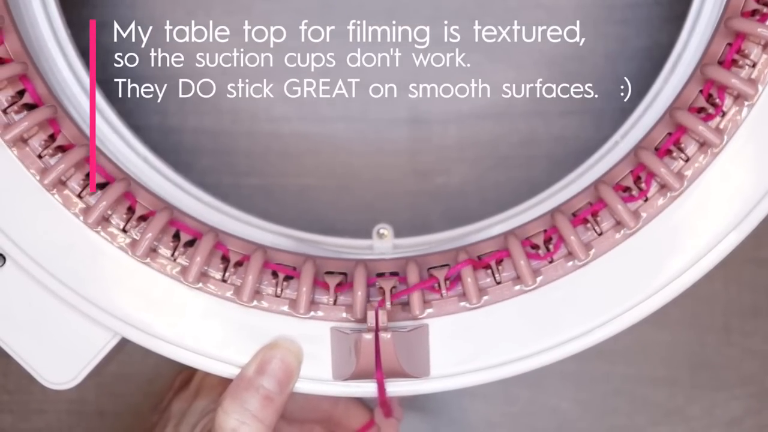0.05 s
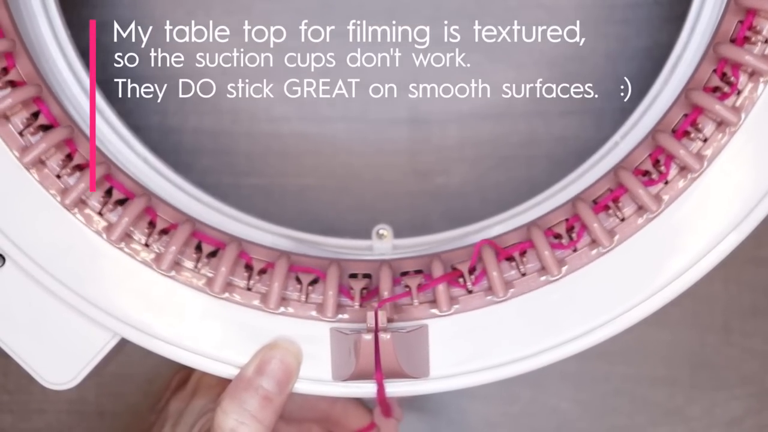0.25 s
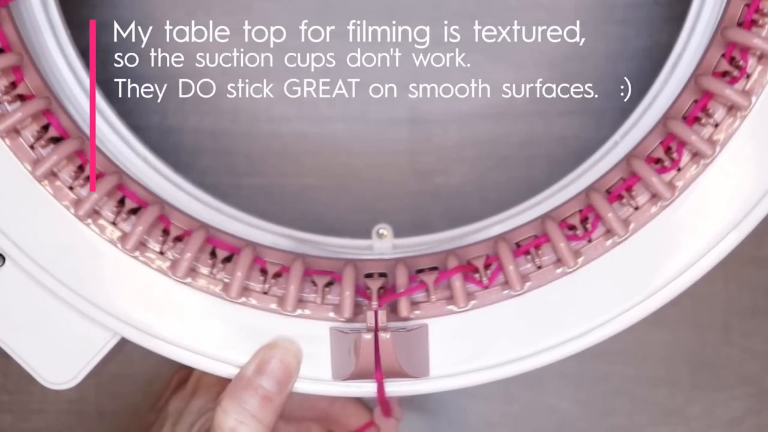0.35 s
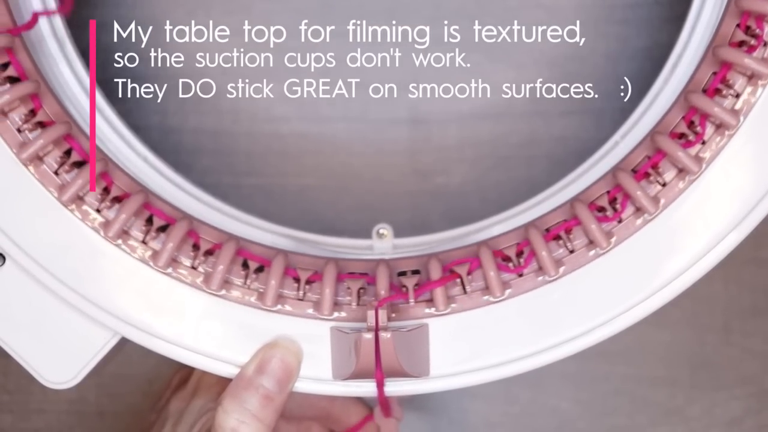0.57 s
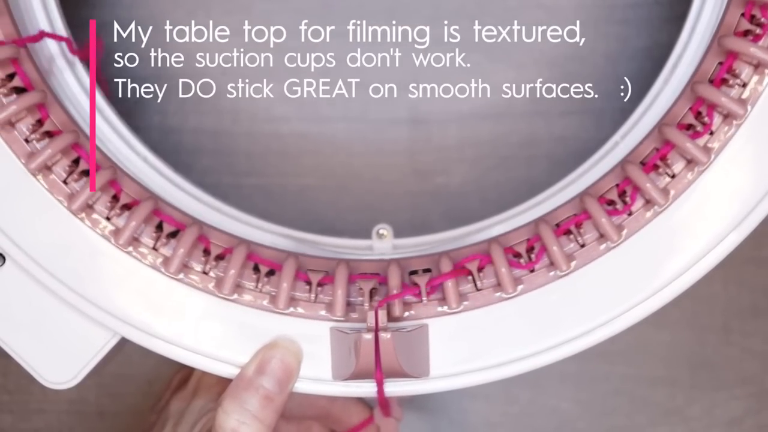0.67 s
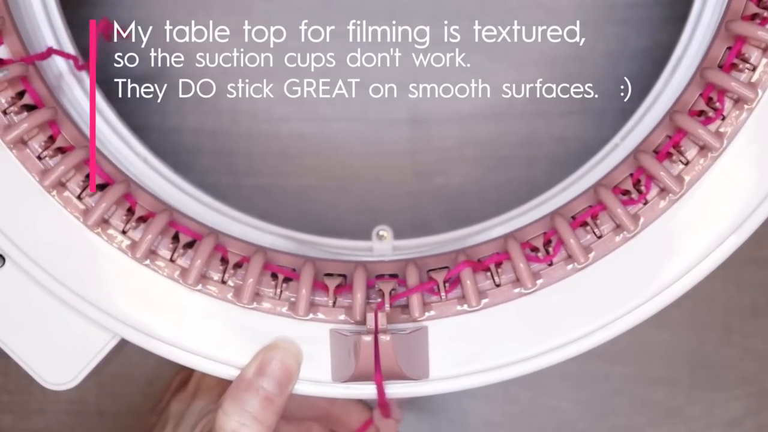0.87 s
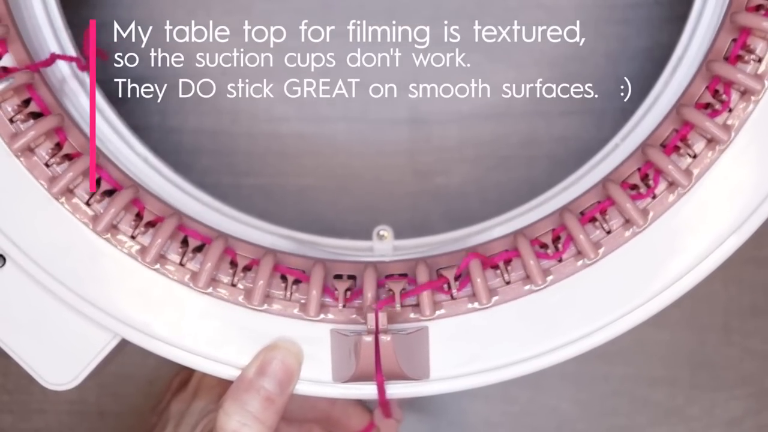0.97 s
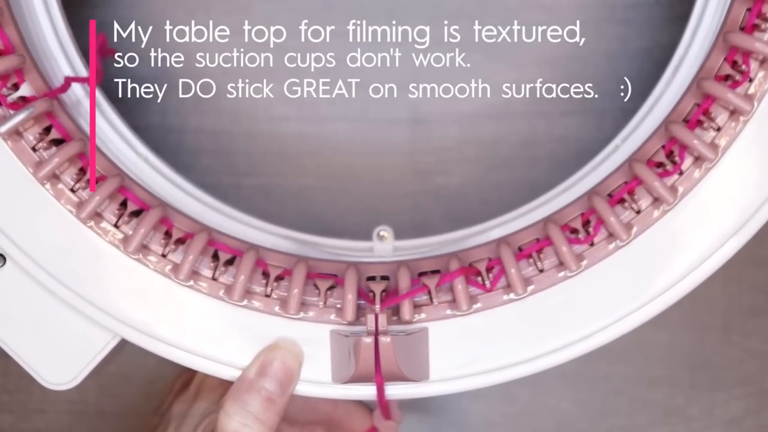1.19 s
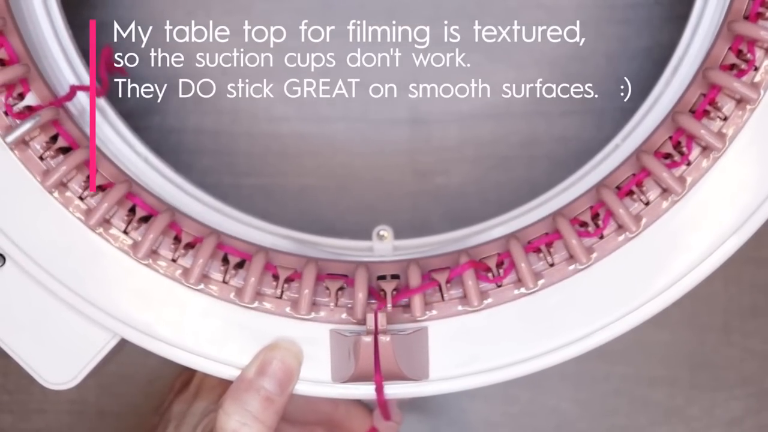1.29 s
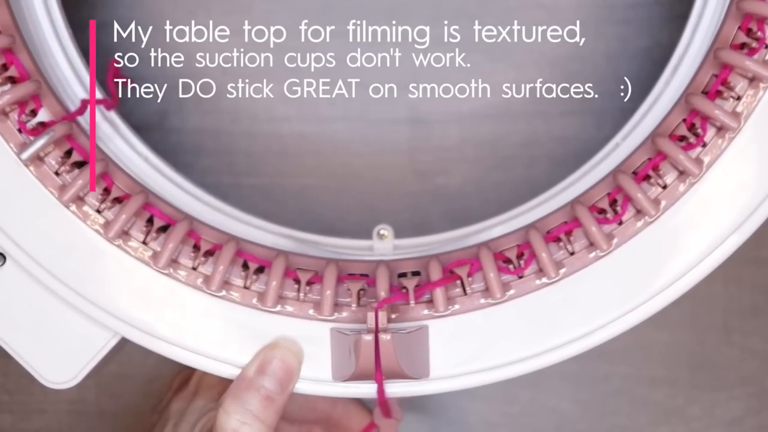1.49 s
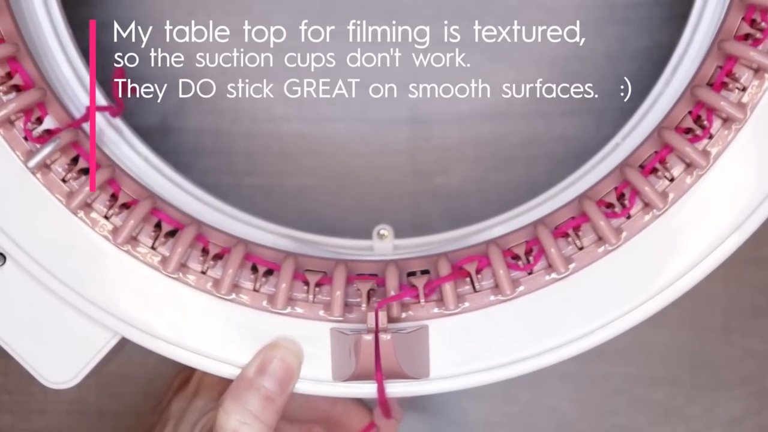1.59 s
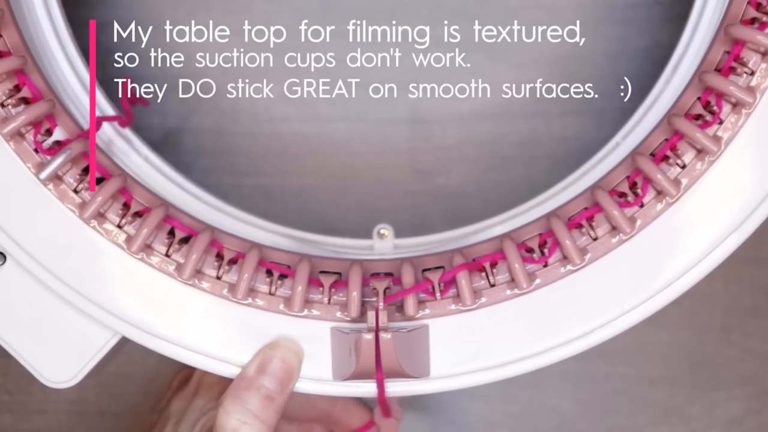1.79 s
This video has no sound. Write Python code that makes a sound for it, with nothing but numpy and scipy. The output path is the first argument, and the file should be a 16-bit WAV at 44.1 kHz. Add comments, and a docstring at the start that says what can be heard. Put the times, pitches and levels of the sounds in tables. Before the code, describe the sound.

Sharp, irregular plastic clicks come from the needles of a round knitting machine turning on a table. Two louder snaps carry a hollow knock, and the final one rings briefly. Faint rubbing and low room hush lie underneath, heard up close.

```python
"""A plastic knitting machine, turned slowly

A round knitting machine turns on a table, close to the microphone, in a quiet room. Its ring of
needles rubs softly in its track. Needles tick and snap through the cam, the ramp that guides them;
the hardest slips knock the hollow housing and thump the table. Near the end one needle twangs free."""
import sys
import numpy as np
from scipy import signal
from scipy.fft import rfft, irfft, next_fast_len
from scipy.io import wavfile
from scipy.ndimage import map_coordinates

SR = 44100
rng = np.random.default_rng(int(sys.argv[2]) if len(sys.argv) > 2 else 0)


def wav_out(sig):
    """Save sig, one row per channel (or a flat mono array), as 16-bit PCM at SR to the path in sys.argv[1]."""
    wavfile.write(sys.argv[1], SR, np.round(np.clip(np.atleast_2d(sig).T, -1, 1) * 32767).astype(np.int16))


N = 81585

# Natural tones of the needles and guides: pitch_hz, level_db, fade_s (time to fall by 60 dB)
NEEDLE_TONES = [(1025, -11, 0.058), (1207, -13, 0.071), (1408, -8.5, 0.056), (1585, -22, 0.044),
                (1918, -22, 0.061), (2139, -22, 0.075), (2505, -15.5, 0.04), (2753, -12.5, 0.04),
                (2912, -12, 0.026), (3640, -27, 0.032), (4890, -40, 0.023), (5430, -24.5, 0.037),
                (6180, -28, 0.019), (12480, -28, .02)]
# Natural tones of the hollow housing: pitch_hz, level_db, fade_s
HOUSING_TONES = [(339.7, -3.5, 0.18), (393, -9.5, 0.18), (522, -0.5, 0.16), (584, 1, 0.1), (679.6, 2, 0.11),
                 (717, -5.5, 0.12), (869, -3.5, 0.13)]


def amp(db):
    """Turn decibels into a multiplier."""
    return 10 ** (np.asarray(db) / 20)


def unit(x):
    """Scale a sound to an average (rms) level of 1."""
    return x / np.sqrt(np.mean(x ** 2) + 1e-20)


def along(points, hz):
    """Read between the rows of a (pitch_hz, value) table."""
    pitches, values = np.transpose(points)
    return np.interp(np.log(hz + 1), np.log(pitches + 1), values)


def coloured(x, colour):
    """Make pitches louder or softer, following a (pitch_hz, level_db) table."""
    size = 2 * next_fast_len(len(x))
    gain_db = along(colour, np.fft.rfftfreq(size, 1 / SR))
    cepstrum = irfft(gain_db * np.log(10) / 20, size)
    # Fold onto the first half, so the filter never sounds ahead of a click.
    cepstrum[1:size // 2] *= 2
    cepstrum[size // 2 + 1:] = 0
    return irfft(rfft(x, size) * np.exp(rfft(cepstrum)), size)[:len(x)]


def add(track, start_s, sound):
    """Mix a sound into the track."""
    part = track[max(0, round(start_s * SR)):][:len(sound)]
    part += sound[:len(part)]


def dying_noise(fades, t, count=12):
    """Countless close tones blur into noise whose bands each fade at their own speed."""
    hz = np.fft.rfftfreq(len(t), 1 / SR)
    centres = np.geomspace(fades[0][0], fades[-1][0], count)
    weights = np.array([along(list(zip(centres, row)), hz) for row in np.eye(count)])
    bands = irfft(rfft(rng.standard_normal(len(t))) * weights, len(t))
    return (bands * 10 ** (-3 * t / along(fades, centres)[:, None])).sum(0)


def ring(tones, attack_s, scatter_db):
    """A struck part rings at its natural tones, a little differently at each blow."""
    t = np.arange(SR // 2) / SR
    out = np.zeros(len(t))
    for hz, db, fade_s in tones:
        loudness = amp(db + scatter_db * rng.normal()) * 10 ** (-3 * t / fade_s)
        out += loudness * np.sin(2 * np.pi * (hz * t + rng.random()))
    return out * (1 - np.exp(-t / attack_s))


def rubbing():
    """The needle ring sticks and slips in its track, making the needles and housing sing faintly."""
    # How the rubbing swells and sinks: time_s, relative_db
    swell = [(0, -46), (.09, -44), (.13, -48), (.185, -56), (.25, -39.5), (.31, -37), (.39, -39),
             (.45, -36.5), (.53, -41), (.59, -40.5), (0.631, -39.5), (.68, -48), (.8, -42.5), (.92, -44.5),
             (.99, -47), (1.08, -43), (1.11, -37.5), (1.2, -38), (1.29, -45.5), (1.38, -49.5),
             (1.43, -44.5), (1.49, -38), (1.53, -43), (1.68, -45.5), (1.85, -51.5)]
    # Friction heard through the plastic: pitch_hz, level_db
    rub_colour = [(60, -10), (170, -3), (270, -15), (350, -3), (440, -11), (540, -5.5), (850, -8),
                  (1250, 4), (1450, 0.5), (1650, -4.5), (2900, -9.5), (3800, -17), (4700, -22), (5700, -18),
                  (7200, -28), (9000, -28.5), (16000, -33)]
    slips_per_s, flutter_per_s, flutter_db = 200, 45, 1.5
    slips = (rng.random(N) < slips_per_s / SR) * rng.standard_normal(N)
    friction = rng.standard_normal(N) + amp(-8.5) * unit(slips)
    rub = unit(coloured(friction, rub_colour))
    needles = unit(ring(NEEDLE_TONES, attack_s=0.0003, scatter_db=1.5))
    housing = unit(ring(HOUSING_TONES, attack_s=0.0047, scatter_db=4.5))
    singing = unit(signal.fftconvolve(rng.standard_normal(N), needles + amp(-3) * housing, "same"))
    # Sticking and slipping makes the level waver smoothly at random.
    flutter = map_coordinates(rng.standard_normal(N // 100), [np.arange(N) * flutter_per_s / SR])
    level_db = np.interp(np.arange(N) / SR, *np.transpose(swell)) + flutter_db * flutter
    return amp(level_db + 2) * unit(rub + amp(-5) * singing)


def room_noise():
    """The quiet room has a steady, low hush."""
    # Colour of the hush: pitch_hz, relative_db
    hush_colour = [(25, -4), (48, -9), (68, 4.5), (100, 5.5), (125, -5), (170, 0.5), (260, -11.5),
                   (500, -11.5), (1250, -16.5), (2000, -15.5), (4000, -23.5), (8000, -31), (16000, -34.5)]
    return amp(-47.5) * unit(coloured(rng.standard_normal(N), hush_colour))


def needle_clicks():
    """A needle hits the cam: a snap and a short ring, coloured by where it lands."""
    # Needle hits: start_s, level_db, hollow_db, bite_db, edge_db, treble_db, sparkle_db, fade_ratio
    hits = [ (0.0525, -25, -6, 1.5, 8.5, 0, -5, 0.88), (.0595, -24, 6, 2.5, -19, -17, -16, 0.82),
            (.1953, -19.5, 4, 4, 6, 10, 11, 2.4), (0.2035, -17.5, 7, 8, 3, 13.5, 12, 1.1),
            (.2088, -2.5, 2, 7.5, -1.5, 2.5, 4, 0.88), (.2478, -35, 12, 5, -2, 10, 10, 1),
            (0.2545, -26.5, 7, 8, -3, -5, -7, 1.4), (.3185, -28, -7, 5, -11, -7, -3, 0.9),
            (0.3505, -11, -4, -3, 9, 1, -1.5, 0.75), (0.3615, -15.5, 8.5, 8, -0.5, -7, -4, 0.88),
            (.4748, -24.5, -8, 23, 2, 10, 0, 1.1), (.478, -9.5, -1, 3.5, -0.5, -1, 8, 0.81),
            (0.6421, -26, 3, -29, -17, -15, -9, 0.97), (0.8891, -31.5, -14, -4, 3, 2, 6, 0.91),
            (0.8928, -23.5, 5, 9, -12.5, -9, -12, 1.2), (0.9552, -37, 5, 11, 7, -21, -14, 0.63),
            (1.0151, -25, 10.5, 5, 9, 6, 0, 0.76), (1.025, -18, 11, 8.5, 5, 1.5, 11, 0.84),
            (1.0369, -12, -5.5, 11, 1.5, 5.5, 11, 1.13), (1.0378, -6.5, 9, 10, -2, 4, -18, 0.82),
            (1.0437, -16.5, -18, 5, 3, 6, -6, 0.77), (1.055, -16, 5, 6.5, -4, -7, -20, 0.83),
            (1.1512, -24.5, 1, 4, -7, -18, -21, 1), (1.157, -20.5, -6, 12, -8, -20, -3, 0.76),
            (1.1654, -19, 2.5, -3, -5, -4, -7, 0.75), (1.1742, -21, -22, 0, -2.5, 14, 5, 0.78),
            (1.177, -12.5, -3, 1.5, 4.5, 5, -3, 0.66), (1.3104, -29, -12, -16, -4, -2, 2, 1.7),
            (1.3252, -9.5, 0, 6.5, 4.5, 1.5, -3, 0.8), (1.5409, -22, -23, 18, 6, -13, -4, 0.45),
            (1.549, -9, -13.5, 2, 1, 7, 3.5, 0.62), (1.551, -19, 4.5, 2, 12, -6, -3, 0.67)]
    # Colour of the ringing plastic: pitch_hz, level_db
    plastic_colour = [(100, -12), (380, -12), (560, -1), (880, -1), (1200, 9), (1420, 11.5), (1650, 0),
                      (2100, -1), (2400, -3.5), (2950, 3), (3500, -1.5), (4600, -6.5), (5900, -6.5),
                      (7600, -18), (10000, -19.5), (12000, -17.5), (16000, -31)]
    # How long it rings, before each hit's fade_ratio: pitch_hz, fade_s
    plastic_fades = [(300, 0.12), (1200, 0.049), (3000, 0.053), (6000, 0.033), (14000, 0.03)]
    rise_s, snap_db = 0.00021, 13
    out, t = np.zeros(N), np.arange(SR // 8) / SR
    for start_s, level_db, hollow_db, bite_db, edge_db, treble_db, sparkle_db, fade_ratio in hits:
        fades = [(hz, fade_s * fade_ratio) for hz, fade_s in plastic_fades]
        burst = dying_noise(fades, t) * (1 - np.exp(-t / rise_s))
        burst[round(rise_s * SR)] += amp(snap_db)
        plastic = coloured(burst, plastic_colour)
        tones = [(hz, db, fade_s * fade_ratio) for hz, db, fade_s in NEEDLE_TONES]
        needle = ring(tones, attack_s=0.00034, scatter_db=2.5)[:len(t)]
        tint = [(700, hollow_db), (1100, 0.0094), (1450, 0), (2000, bite_db), (3000, edge_db),
                (4200, 0), (6000, treble_db), (13000, sparkle_db)]
        add(out, start_s, amp(level_db - 3) * coloured(plastic + needle, tint))
    return out


def room_echo(x):
    """The room answers each sound with a short, fading tail."""
    # How long the room rings: pitch_hz, fade_s
    room_fades = [(100, 0.55), (1500, 0.25), (5000, 0.11), (14000, 0.2)]
    tail = dying_noise(room_fades, np.arange(SR // 2) / SR)
    return signal.fftconvolve(x, tail / np.linalg.norm(tail))[:N]


def knocks():
    """A jolt rings the hollow housing; the table follows more slowly with a thump."""
    # Jolts of the needle ring: start_s, housing_db, table_db
    jolts = [(0.21, -21, -20), (0.3626, -35.5, -27.5), (.479, -45.5, -40.5), (0.64, -45.5, -41.5),
             (1.0398, -25.5, -19), (1.166, -35.5, -26.5), (1.3266, -35.5, -30), (1.549, -43, -36)]
    # Colour of the housing's noisy ring: pitch_hz, level_db
    body_colour = [(60, -19), (150, 10.5), (260, -7.5), (360, 5.5), (450, -13), (560, -6), (750, 10),
                   (1000, -5.5), (1500, 4.5), (2200, -1), (4000, -5), (9000, -44)]
    # How long that ring lasts: pitch_hz, fade_s
    body_fades = [(150, 0.23), (700, 0.1), (3000, .05)]
    # Natural tones of the table: pitch_hz, level_db, fade_s
    table_tones = [(75.1, -7.5, 0.44), (94, 1, 0.17), (144.8, -3.5, 0.15), (198, -6.5, .12)]
    table_delay_s = 0.00773
    out, t = np.zeros(N), np.arange(SR // 4) / SR
    for start_s, housing_db, table_db in jolts:
        knock = ring(HOUSING_TONES, attack_s=0.0043, scatter_db=0.5)
        body = coloured(dying_noise(body_fades, t), body_colour)
        thump = ring(table_tones, attack_s=0.009, scatter_db=1.0)
        add(out, start_s, amp(housing_db) * knock)
        add(out, start_s, amp(housing_db + 7) * body)
        add(out, start_s + table_delay_s, amp(table_db) * thump)
    return out


def needle_twang():
    """One needle springs free and rings on."""
    # Natural tones of the free needle: pitch_hz, level_db, fade_s
    twang_tones = [(1790, -13, 0.048), (1904, -0.5, 0.058), (2580, -4, 0.03), (3310, -17, 0.041)]
    twang = amp(-11.5) * ring(twang_tones, attack_s=0.0006, scatter_db=1.0)
    out = np.zeros(N)
    add(out, start_s=1.549, sound=twang)
    return out


def scene():
    """Mix the machine's blows, their faint echo, the rubbing and the hush into one channel."""
    blows = needle_clicks() + needle_twang() + knocks()
    hush = room_noise()
    return (blows + amp(-21.5) * room_echo(blows) + rubbing() + hush)[None]


def record(dry):
    """The microphone loses the deepest bass and highest treble, and rounds off the hardest peaks."""
    low_cut_hz, top_hz, ceiling = 51, 15950, 0.85
    thinned = signal.sosfilt(signal.butter(4, low_cut_hz, "high", fs=SR, output="sos"), dry)
    rounded = thinned / (1 + abs(thinned / ceiling) ** 6) ** (1 / 6)
    size = next_fast_len(N + SR // 2)
    below_top = np.fft.rfftfreq(size, 1 / SR) < top_hz
    return irfft(rfft(rounded, size) * below_top, size)[..., :N]


dry = scene()
out = record(dry)
wav_out(out)
```